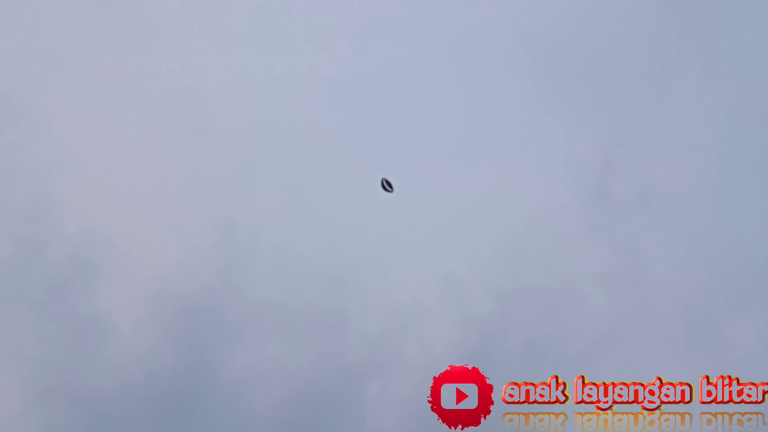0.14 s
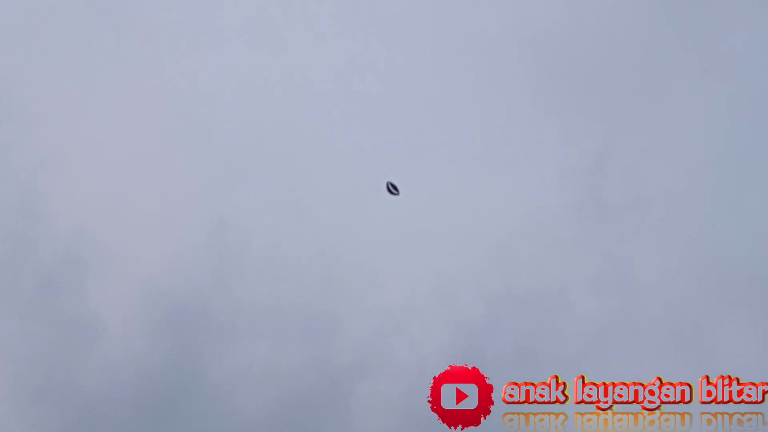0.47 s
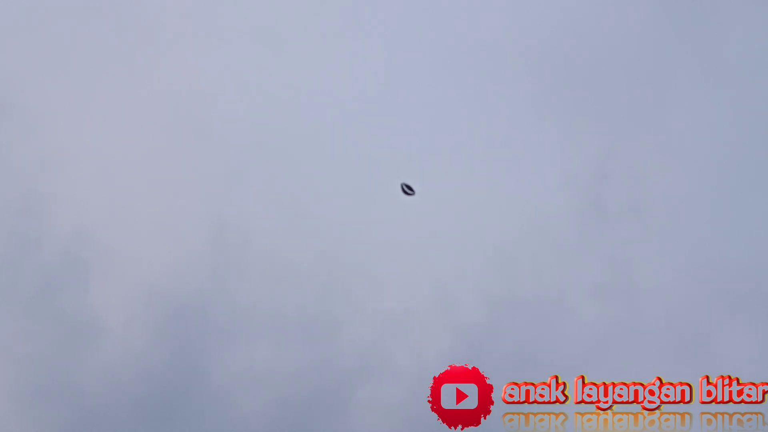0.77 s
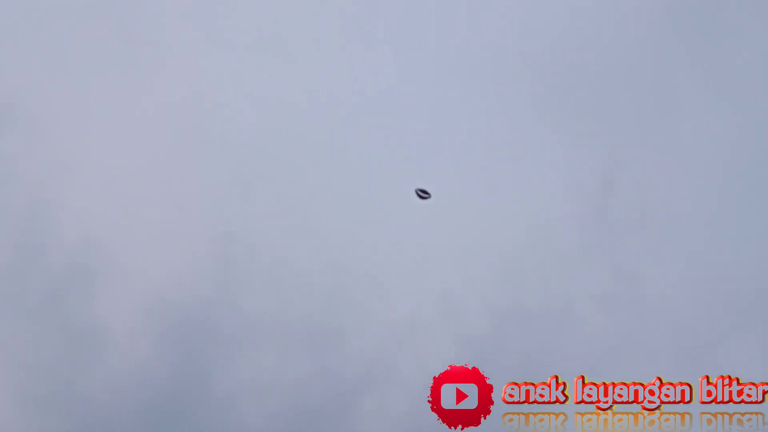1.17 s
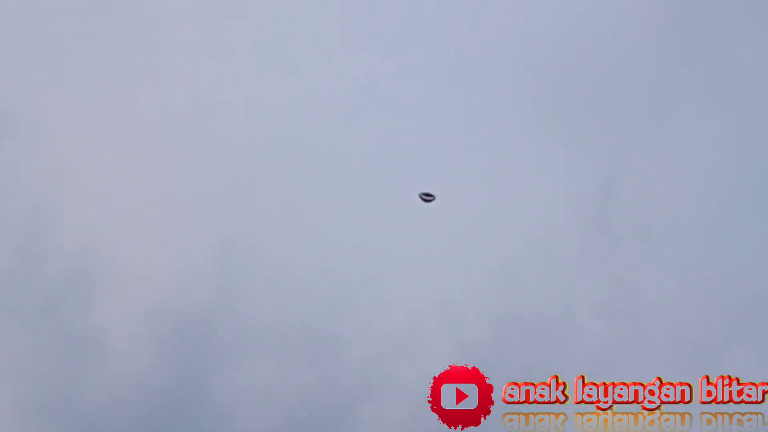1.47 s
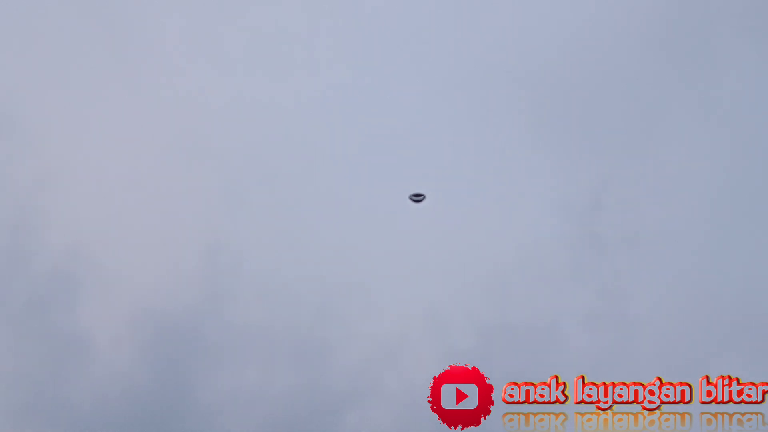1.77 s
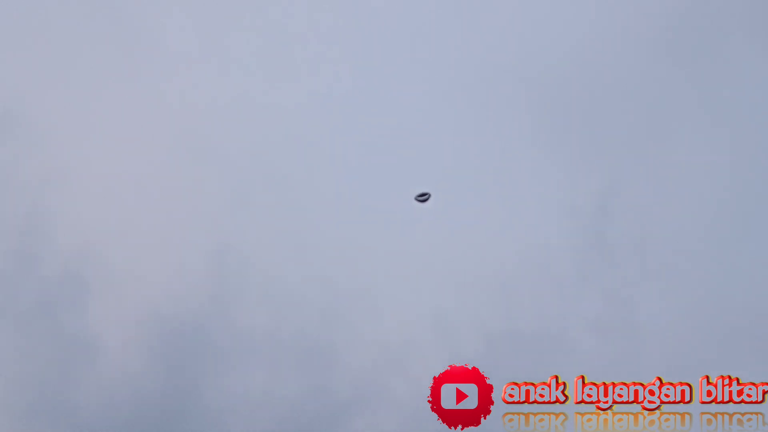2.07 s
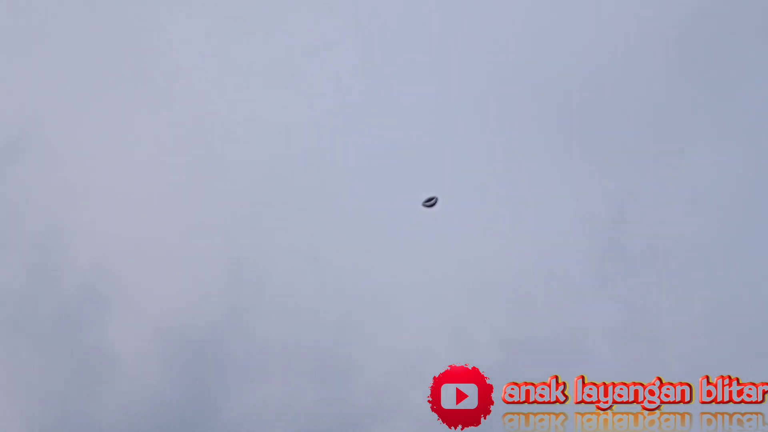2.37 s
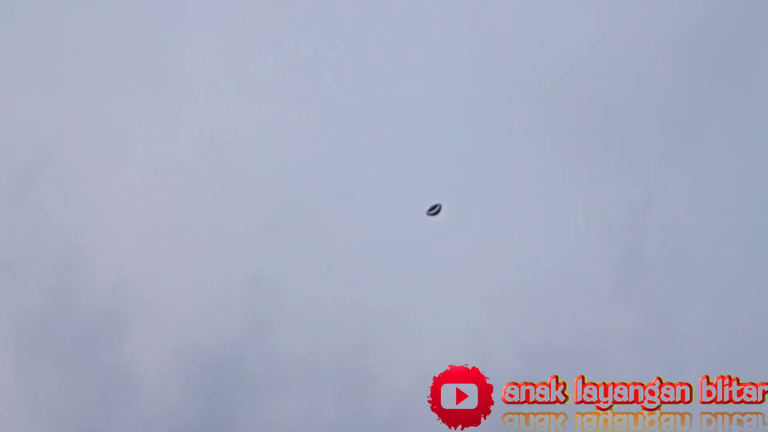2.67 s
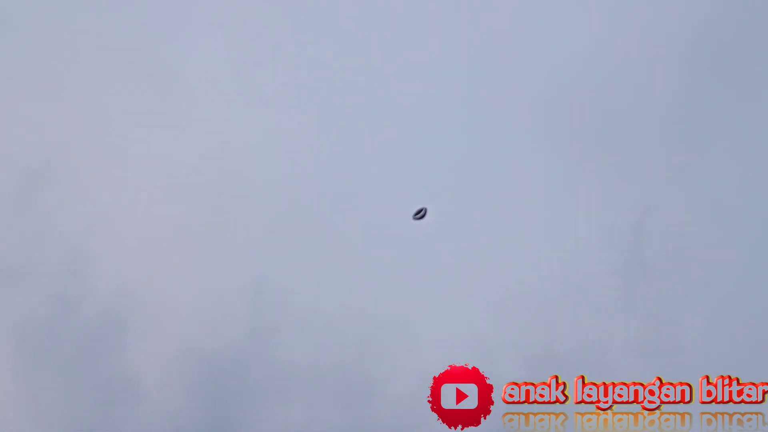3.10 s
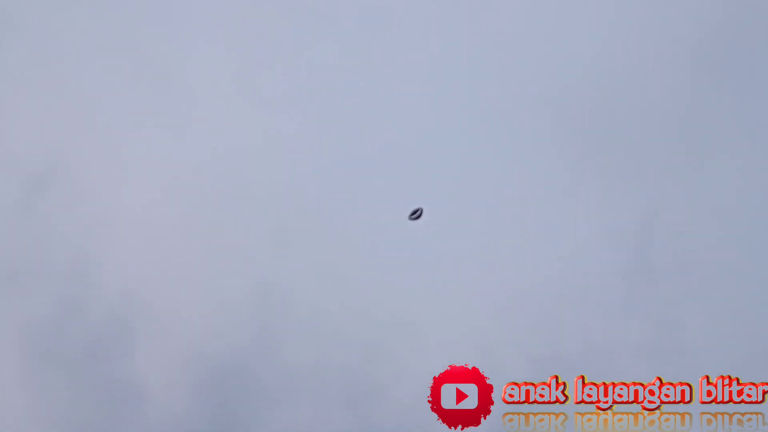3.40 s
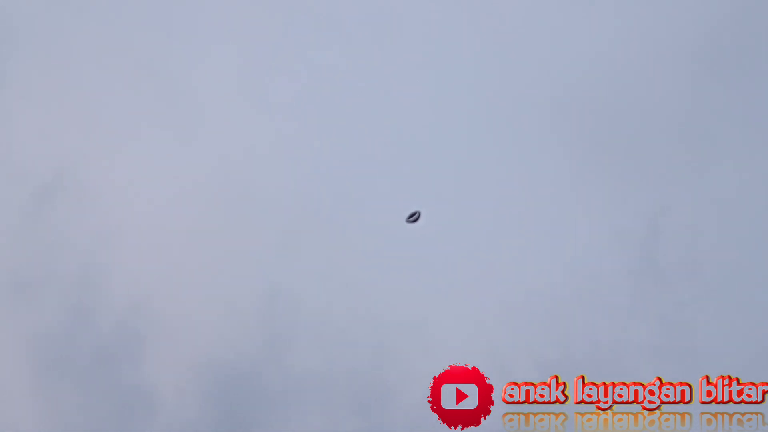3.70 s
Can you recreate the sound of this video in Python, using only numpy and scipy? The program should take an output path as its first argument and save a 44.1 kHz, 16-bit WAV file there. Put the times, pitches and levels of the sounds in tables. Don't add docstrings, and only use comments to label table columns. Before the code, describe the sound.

Steady rapid warbling hum from a high kite's ribbon, with light wind hiss and shrill field insects.

```python
import sys
import numpy as np
from scipy import signal
from scipy.io import wavfile
from scipy.ndimage import uniform_filter1d

SR = 44100
rng = np.random.default_rng(int(sys.argv[2]) if len(sys.argv) > 2 else 0)


def how_loud(loudness_db):
    steps = np.asarray(loudness_db, float) / 20
    return 10 ** steps


def materialize(psi):
    bounded = np.clip(np.atleast_2d(psi).T, -1, 1)
    quanta = np.round(bounded * 32767).astype(np.int16)
    wavfile.write(sys.argv[1], SR, quanta)


N = 169785

# t/s, bow resonance/dB, ground echo/dB, upper overtones/dB, second overtone/dB
ATTITUDE = [(0, -9, -16, 2, -2), (.3, -19, -17, -3.5, -0.5), (.7, -24, -11.5, -1, 0.5),
            (1, -20, -11, 3, 3.5), (1.3, -18, -8, -3.5, 2.5), (1.8, -24, -15, -8, -1),
            (2.2, -21, -15, -6, 0), (2.45, -22, -14, -10, -1), (2.7, -16.5, -9.5, -9.5, -3),
            (2.9, -18.5, -17.5, -1, -2.5), (3.05, -26, -16, -1.5, 0.5), (3.85, -22, -21.5, 0, 1.3)]


def evened(x):
    return x / np.sqrt(np.mean(x ** 2) + 1e-20)


def slow_noise(count, size):
    once = uniform_filter1d(rng.standard_normal(count), size=size)
    return evened(uniform_filter1d(once, size=size))


def track(t, table):
    times, *columns = np.transpose(table)
    return [np.interp(t, times, column) for column in columns]


def add(mix, s, sound):
    at = round(s * SR)
    part = mix[max(at, 0):][:len(sound) + min(at, 0)]
    part += sound[max(-at, 0):][:len(part)]


def face(flips, over_db, rise_s, fall_s, over_share, lead_s, glide, split):
    flip_s, split_hz, null_s = .09, 88.8, 0.0016
    wobble_db, wobble_ms, wobble_hz = .45, .35, 4
    out = np.zeros(N)
    u = np.arange(-1600, 1600) / SR
    count = round(N / SR / flip_s) + 1
    low_pass = signal.butter(2, 130, fs=SR)
    rasp = .9 * evened(signal.lfilter(*low_pass, rng.standard_normal((count, 5, len(u)))))
    width = np.where(u > 0, fall_s, rise_s)
    first_lag_s = flips[0][1] / 1000

    for k, chance in enumerate(rng.standard_normal((count, 10))):
        lag_ms, hz, body_hz, db, *upper_db = track(k * flip_s + first_lag_s, flips)
        bow_db, _, edge_db, second_db = track(k * flip_s, ATTITUDE)
        hz = hz + wobble_hz * chance[0]
        body_hz = body_hz + wobble_hz * chance[1]

        if split:
            upper = how_loud(upper_db[0])
            upper_phase = (body_hz + split_hz / 2) * u - split_hz * null_s
            tone = np.cos(2 * np.pi * (body_hz - split_hz / 2) * u) - upper * np.cos(2 * np.pi * upper_phase)
            rise = glide * max(1.05 - upper, 0)
        else:
            tone = np.cos(2 * np.pi * body_hz * u)
            rise = glide

        over = np.zeros(len(u))
        gliding_s = u + rise * u ** 2 / 2
        for j, partial_db in enumerate(over_db):
            level_db = partial_db + (edge_db if j else second_db) + (j + 1) * wobble_db * chance[4 + j]
            partial = how_loud(level_db) * np.sin(2 * np.pi * (j + 2) * hz * gliding_s)
            shorter = np.exp(-j * 0.098 * (u / rise_s) ** 2)
            over += partial * shorter * (1 + min(j + 0.13, 1) * rasp[k, j])
        if not split:
            twin = np.sin(2 * np.pi * (2 * hz + 70.5) * u + 2 * chance[9])
            over += how_loud(over_db[0] + second_db - 12.5) * twin
        bow_hz = 1276 + 3.6 * wobble_hz * chance[1]
        over += how_loud(bow_db) * np.sin(2 * np.pi * bow_hz * u + chance[9])

        burst = tone * np.exp(-.5 * (u / width) ** 2)
        burst += over * np.exp(-.5 * ((u + lead_s) / width / over_share) ** 2)
        start = k * flip_s + (lag_ms + wobble_ms * chance[2]) / 1000 + u[0]
        add(out, start, np.sqrt(2) * how_loud(db + wobble_db * chance[3]) * burst)
    return out


def hummer():
    # t/s, travel lag/ms, ribbon f/Hz, split-tone centre f/Hz, level/dB, upper tone/dB
    high_flips = [(0, 50.4, 700, 712, -22, -9), (.2, 53, 707, 720, -18.5, -11),
                  (.33, 52.3, 710, 703, -16.5, -11.5), (.6, 50.3, 695, 706, -16.5, -11.5),
                  (.95, 54.7, 717, 708, -18, -8.5), (1.3, 52.2, 704, 711, -16.5, -11.5),
                  (1.58, 52.4, 712, 697, -16, -12), (1.7, 55, 713, 702, -19, -8),
                  (2.05, 49, 694, 687, -20.5, -14.5), (2.25, 52.6, 645, 702, -29, -8),
                  (2.39, 49, 645, 685, -30.5, -4), (2.48, 49, 650, 672, -26, -9),
                  (2.78, 48, 630, 674, -24, -5), (2.92, 47, 710, 692, -20, -6),
                  (3.2, 48.3, 701, 684, -17.5, -4), (3.5, 48.7, 703, 681, -17.5, -7),
                  (3.85, 48.7, 700, 680, -19, -6.5)]
    # t/s, travel lag/ms, ribbon f/Hz, body f/Hz, level/dB
    low_flips = [(0, 8, 577, 622, -22), (.6, 7.1, 601, 617, -20), (.98, 7.4, 611, 621, -21.5),
                 (1.08, 7, 610, 620, -19), (1.18, 6.9, 596, 619, -23.5), (1.35, 7, 600, 627, -18.5),
                 (1.45, 6.8, 600, 616, -23.5), (1.75, 8.4, 584, 609, -22), (2.1, 8, 570, 618, -26),
                 (2.45, 6.1, 568, 596, -30.5), (2.7, 3.22, 562, 602, -25), (2.85, 2.4, 594, 605, -20.5),
                 (3.15, 0.1, 602, 598, -17.5), (3.4, 0.73, 582, 594, -19.5), (3.85, 3.14, 603, 605, -20.5)]
    high_over_db = [-14.5, -26.5, -36, -31.5, -37.5]
    low_over_db = [-13, -31, -36, -35.5, -32]
    direct = face(high_flips, high_over_db, rise_s=0.0059, fall_s=0.0067, over_share=0.94, lead_s=0.0014,
                  glide=6, split=True)
    direct += face(low_flips, low_over_db, rise_s=0.0085, fall_s=0.0067, over_share=0.83, lead_s=0.0021,
                   glide=0.57, split=False)
    direct = direct * (1 + .08 * slow_noise(N, 120))

    t = np.arange(SR // 2) / SR
    tail = rng.standard_normal(len(t)) * how_loud(-60 * t / 0.27) * (t > .008)
    echo = signal.fftconvolve(direct, tail / np.linalg.norm(tail))[:N]
    echo_db = track(np.arange(N) / SR, ATTITUDE)[1]
    return direct + how_loud(echo_db) * echo


def noise(points, patchy_db):
    hz = np.fft.rfftfreq(1024, 1 / SR)
    f, db = np.transpose(points)
    a, b, patches = rng.standard_normal((N // 256 + 5, 513, 3)).T
    patches = uniform_filter1d(patches, size=5, axis=0)
    patches = evened(uniform_filter1d(patches, size=14, axis=1))
    shape_db = np.interp(np.log(hz + 1), np.log(f + 1), db)[:, None]
    z = (a + 1j * b) * how_loud(shape_db + patchy_db * patches)
    return evened(signal.istft(z, nperseg=1024, noverlap=768)[1][:N])


def wind():
    # t/s, level/dB
    gusts = [
        (0.0, -39),
        (0.39, -43.5),
        (1.16, -40),
        (1.62, -41),
        (2.11, -46.5),
        (2.71, -46),
        (3.34, -41.5),
        (3.85, -44.5),
    ]
    # f/Hz, density/dB per Hz
    wash = [(220, -44), (330, -9), (440, -9), (560, -0.5), (800, -16.5), (1000, -17.5), (1400, -17.5),
            (2600, -46)]
    hiss = [(1200, -4), (1700, -1.5), (3670, 1), (5600, -9), (7300, -7), (9500, -21), (12000, -52)]
    rumble = [(45, -43), (65, -8), (155, 3), (200, -12), (270, 5), (320, -6.5), (420, -28), (12500, -50)]
    far_chorus = [(5000, -13), (7300, 8), (9500, 7), (11350, -7), (11600, -14), (13400, -19), (14000, -10),
                  (15400, -7)]
    gust_db = track(np.arange(N) / SR, gusts)[0]
    out = how_loud(-34.5 + 0.23 * (gust_db - gust_db.mean())) * noise(wash, patchy_db=0.0)
    out += how_loud(-40.5) * noise(rumble, patchy_db=1.0)
    out += how_loud(-54.5) * noise(far_chorus, patchy_db=1.5)
    return out + how_loud(gust_db - 0.1) * noise(hiss, patchy_db=1.57)


def resonate(x, hz, width):
    turn = np.exp(2j * np.pi * hz * np.arange(len(x)) / SR)
    r = np.exp(-np.pi * width / SR)
    return (turn * signal.lfilter([(1 - r) ** 4], np.poly([r, r, r, r]), x / turn)).real


def insects():
    # f/Hz, width/Hz, level/dB, pulse share, throb depth
    voices = [(7080, 200, -42.5, 0.5, 0.5), (6930, 220, -45.5, 0.5, 0.55), (7660, 500, -43, 0.33, 0.026),
              (8240, 210, -55, .3, .05), (10260, 170, -62, 0.6, .05), (10560, 120, -64, 0.6, .05),
              (10990, 360, -57.5, 0.66, 0.044), (9300, 600, -58, 0.57, .05), (3240, 150, -58, .3, .05),
              (3610, 180, -57, .3, .05), (6555, 500, -52, 0.11, 0.035)]
    pulse_rates = [121.7, 111.8, 187, 154, 138.6, 127, 131.0, 131.0, 90, 96, 100]
    swell_db_per_s, throb_hz, throb_s = 0.72, 9.81, .012
    t, out = np.arange(N) / SR, np.zeros(N)
    throbbing = np.tanh(1.6 * (0.58 + np.cos(2 * np.pi * throb_hz * (t - throb_s))))
    for rate, (hz, width, db, share, throb) in zip(pulse_rates, voices):
        share, throb = np.clip([share, throb], 0, 1)
        drift = 0.042 * np.sin(2 * np.pi * (0.87 * t + rng.random()))
        cycle = (rate * t + drift + rng.random()) % 1
        gate = 1 - share + share * 2.5 * np.exp(-cycle / .24)
        gate = gate * (1 + throb * throbbing)
        body = resonate(gate * rng.standard_normal(N), hz, 2.4 * width)
        out += how_loud(db + swell_db_per_s * (t - 2)) * evened(body)
    return out


def moans():
    # t/s, length/s, from f/Hz, to f/Hz, level/dB
    glides = [(.03, .11, 253, 293, -43), (.115, .17, 290, 468, -30), (.26, .13, 466, 460, -39),
              (.425, .13, 452, 474, -29.5), (.545, .13, 365, 402, -38), (.56, .2, 724, 690, -33),
              (.66, .14, 365, 370, -43), (1.06, .11, 1560, 1650, -51), (1.17, .14, 890, 872, -47),
              (1.17, .14, 275, 268, -43), (1.35, .1, 260, 268, -42), (1.43, .14, 880, 925, -43),
              (1.54, .09, 1650, 1610, -53), (1.58, .11, 1690, 1790, -52), (1.64, .27, 885, 890, -47),
              (1.69, .12, 270, 265, -44), (1.92, .09, 890, 890, -47), (2.0, .17, 1610, 1790, -53),
              (2.09, .08, 888, 890, -42), (2.2, .1, 1610, 1730, -55), (2.3, .11, 890, 886, -42.5),
              (2.55, .45, 285, 272, -44), (3.31, .38, 272, 268, -37.5), (3.6, .28, 476, 487, -37),
              (3.63, .3, 265, 274, -39)]
    out = np.zeros(N)
    for start, length, from_hz, to_hz, db in glides:
        u = np.arange(0, 1, 1 / SR / length)
        hz = from_hz + (to_hz - from_hz) * np.sin(np.pi / 2 * u)
        hz = hz * (1 + .004 * slow_noise(len(u), 1200))
        flutter = 1 + 0.28 * evened(uniform_filter1d(rng.standard_normal(len(u)), size=900))
        swell = np.sin(np.pi * u) ** 0.51 * flutter
        add(out, start, np.sqrt(2) * how_loud(db) * swell * np.sin(2 * np.pi * np.cumsum(hz) / SR))
    return out


def twig_ticks():
    # t/s, f/Hz, level/dB
    snaps = [
        (.6195, 7900, -25),
        (.6195, 8900, -33),
        (.6195, 6000, -34),
        (2.406, 5500, -35),
    ]
    out = np.zeros(N)
    u = np.arange(400) / SR
    bell = np.exp(-.5 * ((u - .002) / .0005) ** 2)
    for s, hz, db in snaps:
        add(out, s - .002, how_loud(db) * bell * np.sin(2 * np.pi * hz * u))
    return out


def scene():
    return (hummer() + wind() + insects() + moans() + twig_ticks())[None]


def roll_off(x):
    return signal.sosfilt(signal.butter(12, 16570, fs=SR, output="sos"), x)


def record(dry):
    low_cut = signal.butter(4, 43, "high", fs=SR, output="sos")
    high_cut = signal.firwin(1401, 15500, window=("kaiser", 9), fs=SR)
    mix = signal.oaconvolve(signal.sosfilt(low_cut, dry), high_cut[None], "same")
    return roll_off(mix)


dry = scene()
out = record(dry)
materialize(out)
```